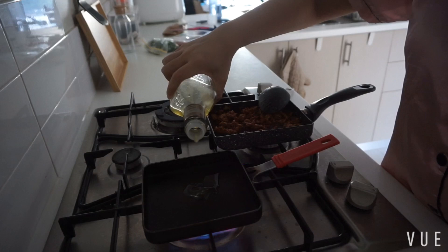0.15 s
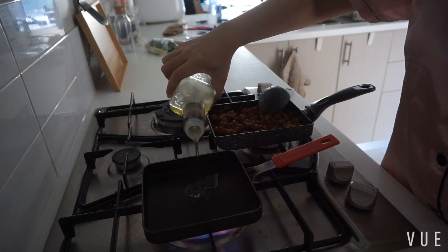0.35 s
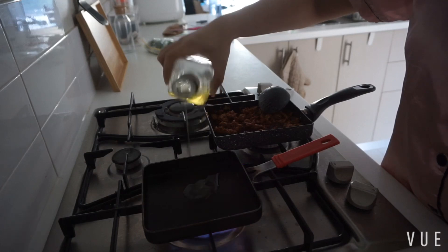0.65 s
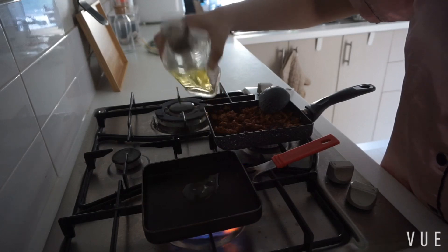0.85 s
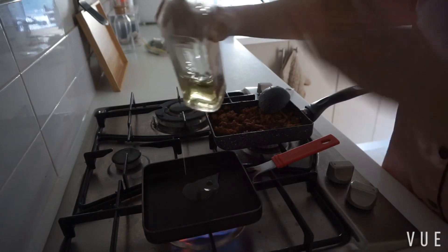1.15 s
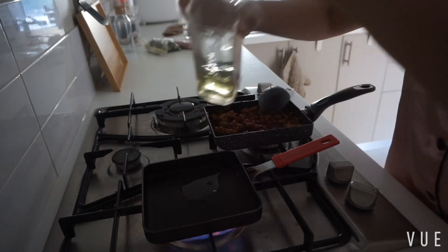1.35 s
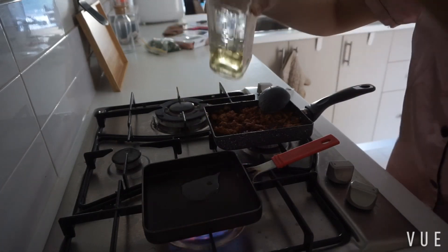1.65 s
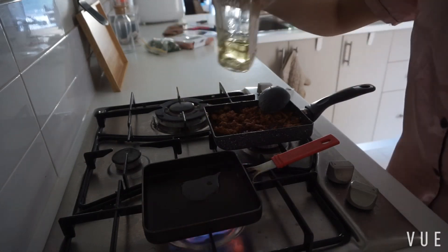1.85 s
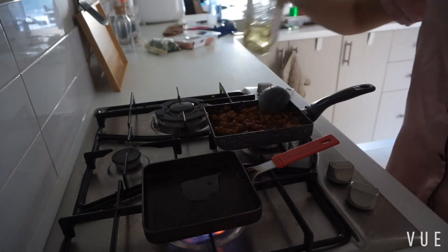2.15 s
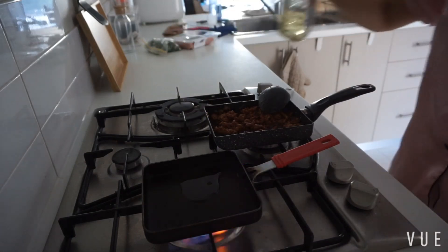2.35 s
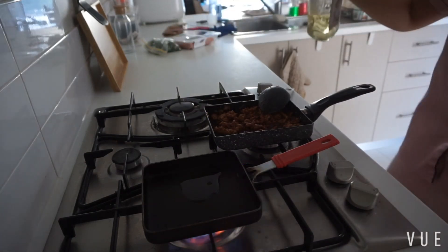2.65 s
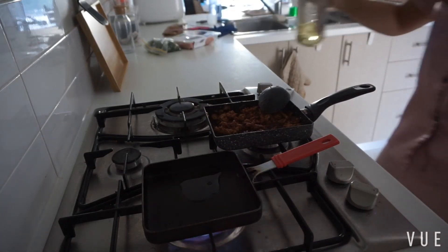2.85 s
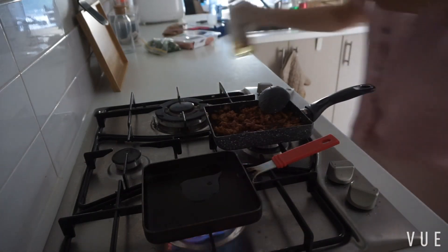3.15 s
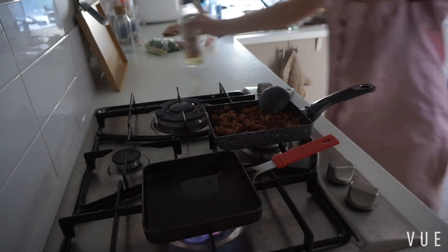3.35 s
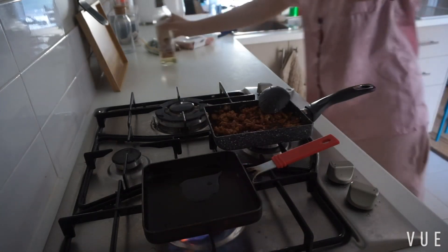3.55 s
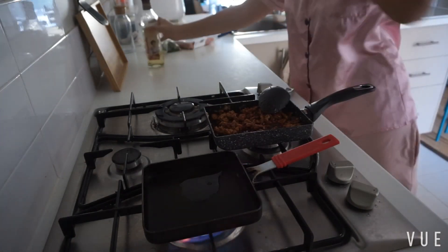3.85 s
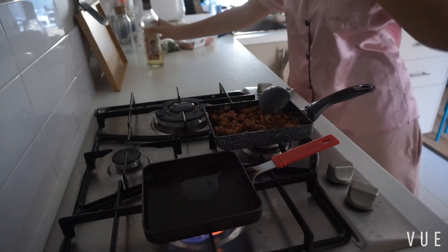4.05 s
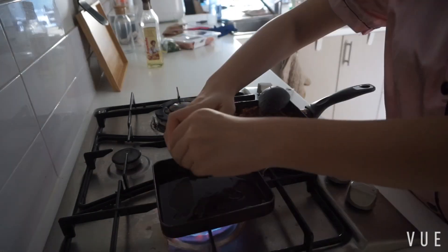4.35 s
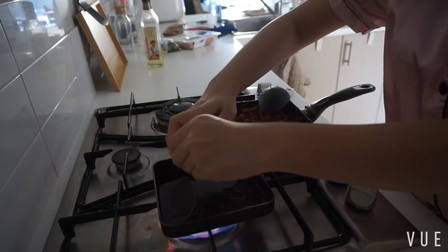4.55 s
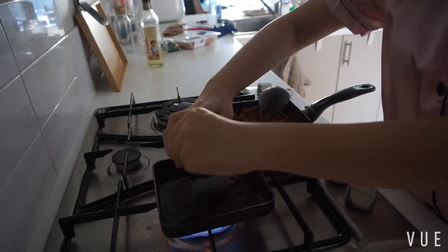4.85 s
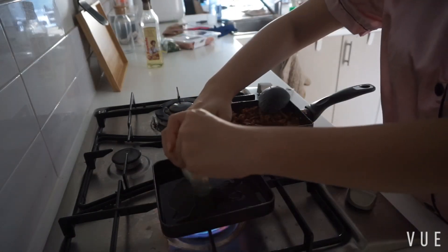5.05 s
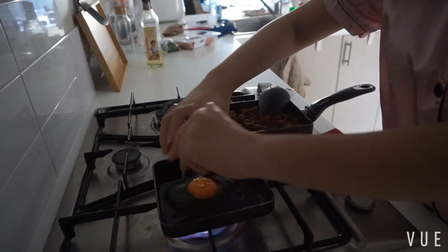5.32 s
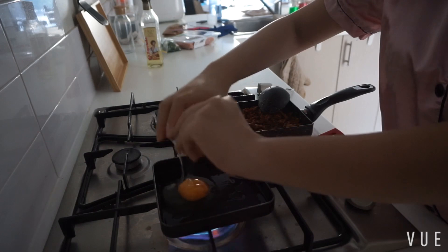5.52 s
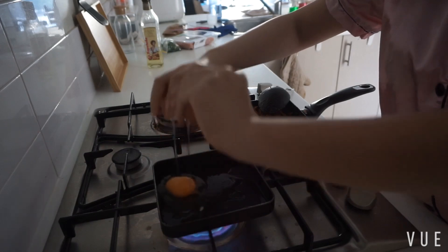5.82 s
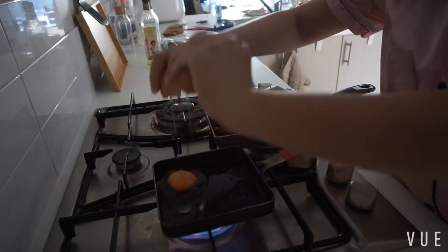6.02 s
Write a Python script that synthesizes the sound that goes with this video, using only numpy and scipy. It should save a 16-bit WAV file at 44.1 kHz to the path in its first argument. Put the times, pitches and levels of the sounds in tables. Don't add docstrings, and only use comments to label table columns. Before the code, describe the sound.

A gas burner roars softly with a thin whine; a bottle cap snaps shut, the bottle thuds on a counter, then an eggshell cracks and crunches open.

```python
import sys
import numpy as np
from scipy import signal
from scipy.io import wavfile
from scipy.ndimage import uniform_filter1d

SR = 44100
rng = np.random.default_rng(int(sys.argv[2]) if len(sys.argv) > 2 else 0)


def magnitude_from_level(level_db):
    exponent = np.asarray(level_db, float) / 20
    return 10 ** exponent


def wav_record(signal):
    frames = np.transpose(np.atleast_2d(signal))
    bounded = np.clip(frames, -1, 1)
    quanta = np.round(bounded * 32767).astype(np.int16)
    wavfile.write(sys.argv[1], SR, quanta)


N = 272621

SECOND_STARTS_S, FIRST_ENDS_S = 4.106, 4.328

# pitch_hz, level_db_per_hz
FIRST_ROAR = [(18, -85.5), (30, -54), (124, -27.5), (194, -14), (243, -17), (390, -2.5), (478, -9.5),
              (820, -3), (938, -6), (1260, -2.5), (3310, -13), (5190, -25.5), (5680, -18.5), (6500, -39),
              (8450, -84), (14300, -120)]
SECOND_ROAR = [(18, -61), (30, -44), (80, -45), (102, -31), (189, -25), (241, -24.5), (384, -10.5),
               (469, -15.5), (892, -10), (1330, -3.5), (2580, -16), (3300, -15.5), (5610, -27.5),
               (6000, -44), (7800, -114), (13200, -120)]
# pitch_hz, level_db_per_hz
AIR_COLOUR = [(2500, -40), (4500, -1.5), (6500, 1.5), (8000, -1), (10000, -1.5), (10900, -1)]
# pitch_hz, likeness_minus_1_to_1
PORT_LIKENESS = [(60, 0.97), (140, 0.85), (350, 0.62), (830, 0.5), (2000, 0.35), (4820, -0.14),
                 (11600, 0.37)]
# pitch_hz, left_minus_right_db
PORT_LEAN = [(60, 3), (170, -0.5), (490, -2), (1410, 0.5), (4040, 0), (11600, 1.5)]
# pitch_hz, t60_s
ROOM_DECAY = [(150, 1), (500, 0.69), (1200, 0.5), (2000, 0.69), (3000, 0.73), (4000, 0.75), (6000, 0.53),
              (10000, 0.41)]
# pitch_hz, likeness_0_to_1
ECHO_LIKENESS = [(150, 0.93), (400, 0.9), (900, 0.78), (1800, 0.4), (5000, 0.1), (10000, 0.93)]
# pitch_hz, level_db
MIC_RESPONSE = [(2000, 0), (3300, 1), (3550, -3), (4300, 0), (4800, 0.5), (5600, -3), (7000, -1.5),
                (9000, -2)]
# time_s, low_mode_hz, high_mode_hz
MOAN_PITCH = [(0, 392, 832), (1.5, 392, 815), (2.5, 384, 775), (3.9, 376, 762), (4.33, 376, 762)]
# middle_s, over_idle_flow_db, half_length_s
PIPE_GUSTS = [
    (1.0, 1, 0.4),
    (2.05, 9, 0.12),
    (2.7, 5, 0.61),
    (3.0, 12, 0.037),
    (3.14, 24, 0.15),
    (3.36, 17, 0.14),
    (3.56, 20, 0.024),
    (3.68, 14, 0.12),
    (3.87, 12.5, 0.16),
]
# time_s, level_db
WHINE_LEVEL = [(0, -60), (1.69, -65), (1.75, -60), (2.27, -71), (2.45, -64), (4.1, -62), (4.33, -74)]
# time_s, level_db
JET_LEVEL = [(4.11, -58), (4.39, -49), (5.15, -48.5), (5.27, -44.5), (5.6, -49.5), (5.95, -53.5),
             (6.18, -49.5)]
# middle_s, peak_db, half_length_s
ARM_RUBS = [(1.07, -70, .04), (1.45, -67.5, 0.34), (1.81, -53, 0.024), (2.23, -50, 0.058),
            (2.33, -62, 0.086), (2.5, -59.5, 0.033), (2.7, -54.5, 0.033), (2.8, -57, 0.1),
            (2.6, -72, 0.066), (3.04, -65, .06), (3.25, -85, .15), (3.46, -54.5, 0.07), (3.62, -70, 0.099),
            (4.2, -56.5, 0.061), (4.33, -63, 0.054), (4.5, -49, 0.11), (4.65, -64, .05), (4.73, -59, 0.033),
            (4.99, -49, .035), (5.07, -54, 0.092), (5.21, -60, 0.036), (5.43, -70.5, 0.13),
            (5.78, -64.5, 0.12), (5.94, -59, 0.15), (6.14, -62.5, 0.17)]
# pitch_hz, width_hz, level_db
COUNTER_MODES = [(202, 28.4, -5.5), (259, 75, -9.5), (372.5, 30.3, 2.5), (490, 62.4, -3), (533, 87, -5.5),
                 (646, 67, -4), (733, 40.4, -4.5), (812, 58.3, -2), (897, 81.5, -2.5), (1204, 136, -11),
                 (1390, 233, -18.5), (2000, 450, -26), (2910, 620, -33), (6760, 4400, -65)]
GLASS_BASE_MODES = [(224, 72, -9), (280, 27, -10), (372, 47, 3), (545, 200, -14.5), (671, 83, -4.5),
                    (835, 120, -8.5), (917, 88, -8.5), (1127, 210, -11.5), (1340, 770, -23.5)]
# start_s, peak_db, rattle_t60_s, left_minus_right_db
BOTTLE_THUDS = [
    (3.9434, -11.5, 0.074, 0),
    (3.9560, -15.5, 0.062, 0),
    (4.1513, -19.5, 0.064, 0.0073),
    (4.164, -21, 0.068, 0),
    (4.178, -22, 0.05, 0),
]
# pitch_hz, width_hz, level_db
CAP_TOUCH_MODES = [(1240, 150, -12.5), (2060, 110, 1.5), (2650, 234, 1), (2894, 330, -6), (3210, 210, -2.5),
                   (3710, 180, -3), (4500, 420, -16.5), (5880, 570, -14.5), (11000, 820, -29.5)]
CAP_CATCH_MODES = [(854, 780, -15), (1224, 76, -3.5), (1660, 156, -0.5), (2300, 290, -8), (2920, 300, -4.5),
                   (4180, 490, -9), (5070, 1100, -14.5), (7400, 2500, -17.5), (10100, 1400, -21.5)]
CAP_SHUT_MODES = [(70, 29, -15), (583, 130, -24), (1200, 260, 8.5), (1680, 150, 13), (2110, 360, 4),
                  (2400, 270, -2), (2690, 500, 10.5), (3220, 160, 6), (4000, 240, -28), (6400, 410, -36),
                  (9200, 8000, -11.5)]
# pitch_hz, width_hz, level_db
FLICK_MODES = [(500, 410, 1), (1170, 480, 0.5), (3000, 1300, -10.5), (7500, 1500, -21), (10400, 970, -6.5)]
# pitch_hz, width_hz, level_db
SHELL_MODES = [(940, 68, -30), (1570, 750, -3.5), (2284, 520, 5.5), (2587, 395, 8), (3400, 1030, -4),
               (4320, 760, -7.5), (6340, 730, -6), (8950, 3900, -15.5)]
# start_s, peak_db, rattle_t60_s, left_minus_right_db
BLOWS = [
    (1.6443, -42, 0.084, 0),
    (1.6726, -39.5, .06, 1),
    (1.7009, -19, 0.095, 1),
    (1.8334, -27, 0.094, 16.5),
    (1.8372, -19.5, 0.037, -6),
    (1.9650, -5, 0.035, .5),
    (3.0266, -37, 0.16, -2),
    (4.4129, -20.5, 0.015, 1),
    (4.4150, -22, 0.24, 1.5),
]
# start_s, peak_db, pitch_hz, treble_against_body_db
SMALL_TICKS = [(1.049, -55, 1720, -17), (1.596, -53.5, 4550, -49), (1.6943, -41, 2430, -14),
               (2.303, -44.5, 2060, -22), (2.4169, -56, 1500, -21), (4.1225, -42, 5230, 1),
               (4.1284, -27, 1940, -1), (4.148, -36.5, 2760, -18), (4.7093, -34, 2300, -28),
               (4.7231, -37.5, 2150, -12.5), (4.8636, -33.5, 1610, -15), (4.8828, -29.5, 2200, -5.5),
               (4.9259, -23, 2060, -20), (4.9455, -29.5, 2280, -4.5), (4.9533, -27.5, 1670, -33),
               (4.9758, -28.5, 3400, -6), (4.9758, -27.5, 1650, -14), (4.9905, -28, 1740, -4.5),
               (5.0698, -38.5, 1570, -23), (5.212, -37, 1640, -22)]


def evened(x):
    return x / np.sqrt(np.mean(x ** 2) + 1e-20)


def read(points, hz):
    f, value = np.transpose(points)
    return np.interp(np.log(hz + 1), np.log(f + 1), value)


def curves(rows):
    s, *columns = np.transpose(rows)
    return [np.interp(np.arange(N) / SR, s, column) for column in columns]


def swells(rows):
    t = np.arange(0, N + 64, 64) / SR
    edge_db = 10.5
    power = sum(magnitude_from_level(db - edge_db * ((t - s) / half) ** 2) ** 2 for s, db, half in rows)
    return np.interp(np.arange(N) / SR, t, np.sqrt(power))


def panned(pan_db):
    return magnitude_from_level([[pan_db / 2], [-pan_db / 2]])


def pair(count, same):
    a, b = rng.standard_normal((2, count))
    same = np.clip(same, -1, 1)
    return np.array([a, same * a + np.sqrt(1 - same ** 2) * b])


def resonate(x, hz, width):
    turn = np.exp(2j * np.pi * np.cumsum(hz * np.ones(x.shape[-1])) / SR)
    r = np.exp(-np.pi * abs(width) / SR)
    return 2 * (turn * signal.lfilter([1 - r], [1, -r], x / turn)).real


def noise(spectrum, patchy_db):
    frames, hz = N // 256 + 5, np.fft.rfftfreq(1024, 1 / SR)
    a, b, c, d, patches = rng.standard_normal((frames, 513, 5)).T
    patches = uniform_filter1d(patches, size=10, axis=0)
    patches = evened(uniform_filter1d(patches, size=12, axis=1))
    same = np.clip(read(PORT_LIKENESS, hz), -1, 1)[:, None]
    left = a + 1j * b
    right = same * left + np.sqrt(1 - same ** 2) * (c + 1j * d)
    colour_db = read(spectrum, hz) + read(PORT_LEAN, hz) * np.array([[.5], [-.5]])
    z = np.array([left, right]) * magnitude_from_level(colour_db[..., None] + patchy_db * patches)
    return evened(signal.istft(z, nperseg=1024, noverlap=768)[1][:, :N])


def whistle(hz, width, level_db, same, pan_db, locked=0):
    once = resonate(pair(N, same), hz, width)
    fuzz = evened(resonate(once, hz, width))
    tone = np.sqrt(2) * np.sin(2 * np.pi * np.cumsum(hz * np.ones(N)) / SR)
    locked = np.clip(locked, 0, 1)
    return magnitude_from_level(level_db) * panned(pan_db) * (np.sqrt(1 - locked) * fuzz + np.sqrt(locked) * tone)


def blow(modes, db, rattle, same=0.41, contact=8.9, passes=1):
    t = np.arange(SR // 5) / SR
    rattling = pair(len(t), same) * magnitude_from_level(-60 * t / abs(rattle))
    drive = np.array([rattling, np.zeros((2, len(t)))])
    drive[..., 0] += contact
    body = 0
    for k, (hz, width, mode_db) in enumerate(modes):
        ring = drive
        for _ in range(passes):
            ring = resonate(ring, hz, width)
        body = body + (-1) ** k * magnitude_from_level(mode_db) * ring
    near, far = body
    far = far * np.linalg.norm(near) / np.linalg.norm(far)
    return magnitude_from_level(db) / abs(near.mean(0)).max() * np.array([near, far])


def add(mix, s, sound, pan_db):
    part = mix[..., round(s * SR):][..., :sound.shape[-1]]
    part += panned(pan_db) * sound[..., :part.shape[-1]]


def room(x):
    taps = np.zeros((2, SR))
    at = np.arange(250, SR - 20, 20) + rng.integers(0, 20, (2, (SR - 251) // 20))
    np.put_along_axis(taps, at, rng.choice([-1., 1.], at.shape), 1)
    hz, t, z = signal.stft(taps, SR, nperseg=256)
    same = np.clip(read(ECHO_LIKENESS, hz), -1, 1)[:, None]
    z[1] = same * z[0] + np.sqrt(1 - same ** 2) * z[1]
    dying = magnitude_from_level(-60 * t / read(ROOM_DECAY, hz)[:, None])
    tail = signal.istft(z * dying, SR, nperseg=256)[1]
    return signal.fftconvolve(x, tail / np.linalg.norm(tail[0]), axes=1)[:, :N]


def distant_motor():
    return whistle(190, 25, -78.5, 1.0, 0.22)


def first_burner():
    return magnitude_from_level(-52.5) * noise(FIRST_ROAR, patchy_db=2.0) + whistle(3314, 200, -80.5, 0.35, 0.3)


def second_burner():
    return magnitude_from_level(-52.5) * noise(SECOND_ROAR, patchy_db=1.1)


def pipe_moan():
    flow = np.sqrt(1 + swells(PIPE_GUSTS) ** 2)
    low_hz, high_hz = curves(MOAN_PITCH)
    low = whistle(low_hz, 10, -70.5, 0.8, 0, locked=0.9)
    high = whistle(high_hz, 20, -66.5, 1, 0, locked=0.65)
    return flow * low + flow ** 0.63 * high


def burner_whine():
    tone = whistle(5513, 28, curves(WHINE_LEVEL)[0], 0.2, 0.49, locked=0.51)
    return tone + whistle(11020, 66, -76.0, 0.59, 0.26)


def jet_db():
    flutter_db, span = -0.6, round(0.042 * SR)
    drift = uniform_filter1d(uniform_filter1d(rng.standard_normal(N), span), span)
    return curves(JET_LEVEL)[0] + flutter_db * evened(drift)


def gas_jet():
    core = whistle(6432, 55, jet_db(), 0.45, 1.4)
    skirt = whistle(6364, 200, jet_db() - 15.0, 0.31, 2.1)
    return core + skirt + whistle(10570, 420, -79, 0.46, 0.4)


def rustle():
    first = np.arange(N) / SR < FIRST_ENDS_S
    hiss = magnitude_from_level(np.where(first, -70.5, -81))
    return (hiss + magnitude_from_level(-2.0) * swells(ARM_RUBS)) * noise(AIR_COLOUR, patchy_db=0.5)


def bottle_on_counter():
    bottle = np.zeros((2, 2, N))
    bodies = [(COUNTER_MODES, 1)] * 2 + [(GLASS_BASE_MODES, 2)] * 3
    for (s, db, rattle, pan_db), (body, passes) in zip(BOTTLE_THUDS, bodies):
        add(bottle, s, blow(body, db, rattle, same=0.87, contact=11.8, passes=passes), pan_db)
    near, far = signal.sosfilt(signal.butter(4, 130, "high", fs=SR, output="sos"), bottle)
    return near + magnitude_from_level(-1.5) * room(far)


def tick(db, hz, treble_db):
    modes = [(hz, 420, 0), (1.7 * hz, 500, -19), (0.67 * hz, 500, -13),
             (5200, 2500, treble_db - 11), (9000, 4000, treble_db - 12.5)]
    rattle_s = 0.017 + 0.068 * magnitude_from_level(treble_db)
    return blow(modes, db, rattle_s, same=0.43, contact=4.7, passes=2)


def tear():
    t = np.arange(N) / SR
    start_s, end_s, rise_s = 4.86, 4.99, 0.012
    growth_db = 6.5 * np.clip((t - start_s) / (end_s - start_s), 0, 1)
    fade_db = 303 * np.maximum(t - end_s, 0)
    return np.clip((t - start_s) / rise_s, 0, 1) * magnitude_from_level(-48.5 + growth_db - fade_db)


def shell_crunch():
    size_db = 2.7 * np.minimum(rng.exponential(1, (2, N)), 4)
    breaks = (rng.random((2, N)) < 300 / SR) * magnitude_from_level(size_db)
    breaks = breaks + 1.0 * breaks[::-1]
    shell = resonate(breaks, 1700, 360) - magnitude_from_level(-9) * resonate(breaks, 1940, 400)
    shell = shell + magnitude_from_level(-10.5) * resonate(breaks, 2550, 930) - magnitude_from_level(-16.0) * resonate(breaks, 12000, 5100)
    return tear() * magnitude_from_level([[1.5], [-1.5]]) * evened(shell)


def cap_and_shell():
    close = np.zeros((2, 2, N))
    bodies = [CAP_TOUCH_MODES] * 3 + [CAP_CATCH_MODES] * 2 + [CAP_SHUT_MODES, FLICK_MODES] + [SHELL_MODES] * 2
    for k, ((s, db, rattle, pan_db), body) in enumerate(zip(BLOWS, bodies)):
        passes = 2 if k < 2 else 1
        add(close, s, blow(body, db, rattle, passes=passes), pan_db)
    for s, db, hz, treble_db in SMALL_TICKS:
        add(close, s, tick(db, hz, treble_db), 1.5)
    high_pass = signal.butter(2, 450, "high", fs=SR, output="sos")
    near, far = signal.sosfilt(high_pass, close + shell_crunch())
    return near + magnitude_from_level(-11.5) * close[0] + magnitude_from_level(-5.5) * room(far)


def scene():
    t = np.arange(N) / SR
    overlap = np.clip((t - SECOND_STARTS_S) / (FIRST_ENDS_S - SECOND_STARTS_S), 0, 1)
    first_gain = magnitude_from_level(-6 * overlap) * np.clip((FIRST_ENDS_S - t) / 0.00051, 0, 1)
    second_gain = np.clip((t - SECOND_STARTS_S) / 0.0015, 0, 1)
    first = first_burner() + pipe_moan() + burner_whine() + bottle_on_counter()
    second = second_burner() + gas_jet()
    return distant_motor() + first_gain * first + second_gain * second + rustle() + cap_and_shell()


def band_limit(x):
    return signal.sosfilt(signal.butter(12, 12180, fs=SR, output="sos"), x)


def record(dry):
    hz, t, z = signal.stft(dry, SR, nperseg=1024)
    z = z * magnitude_from_level(read(MIC_RESPONSE, hz))[:, None]
    power = uniform_filter1d((abs(z) ** 2).mean(0), size=12, axis=0)
    power = uniform_filter1d(power, size=2, axis=1)
    faint = (power < magnitude_from_level(-101) ** 2) & (hz > 5000)[:, None]
    gated = signal.istft(z * ~faint, SR, nperseg=1024)[1][:, :N]
    band = signal.firwin(511, 11080, window=("kaiser", 9), fs=SR)
    limited = signal.oaconvolve(gated, band[None], "same")
    return band_limit(limited)


dry = scene()
out = record(dry)
wav_record(out)
```